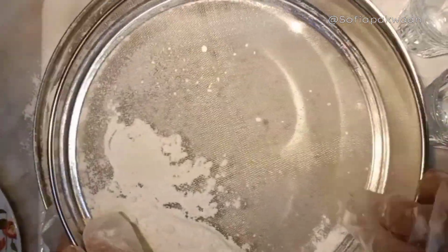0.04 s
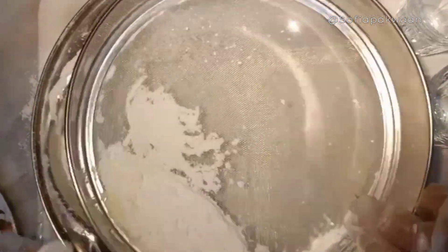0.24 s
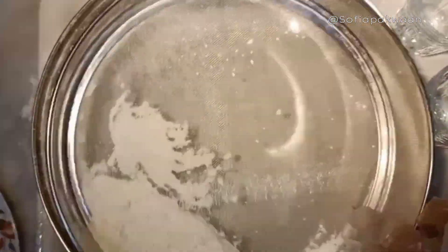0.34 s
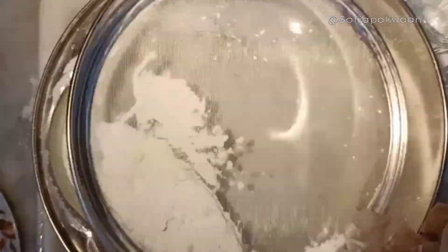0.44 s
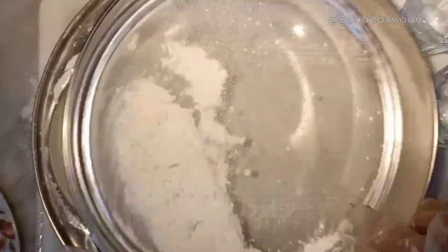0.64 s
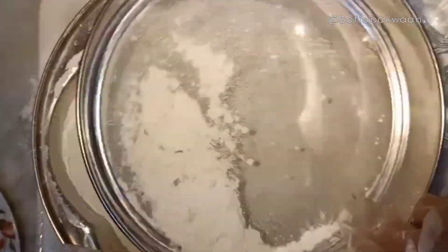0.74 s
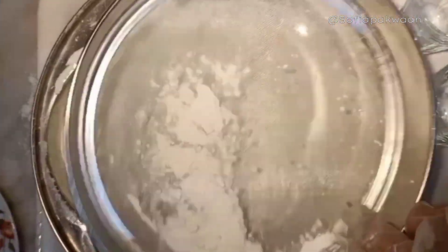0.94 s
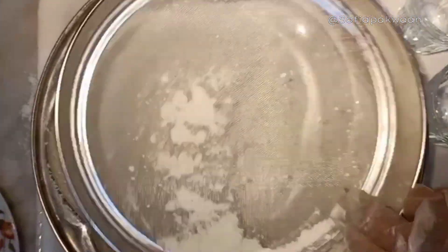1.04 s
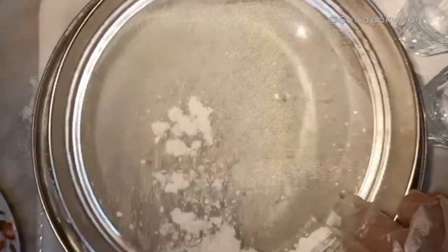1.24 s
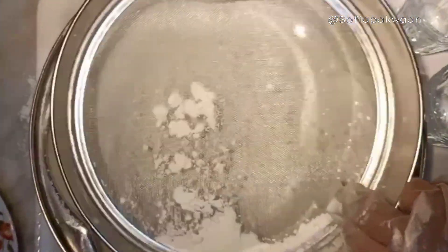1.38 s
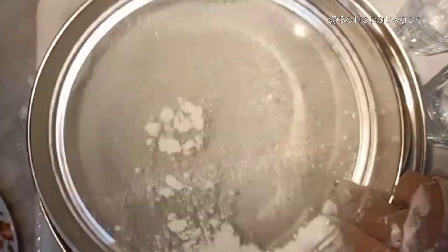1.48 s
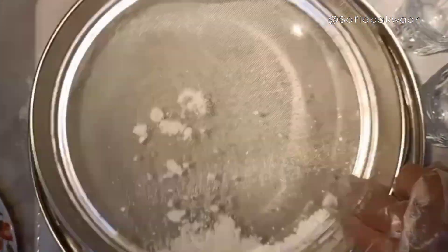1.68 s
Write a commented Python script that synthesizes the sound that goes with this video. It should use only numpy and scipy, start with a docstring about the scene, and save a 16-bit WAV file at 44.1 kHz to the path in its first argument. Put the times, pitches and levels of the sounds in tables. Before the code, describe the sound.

A metal sieve knocks and rings against a steel bowl amid swishing flour, close up in a kitchen

```python
"""A steel flour sieve is shaken over a steel bowl in a kitchen.
First flour hisses over the wire mesh among light ticks, and goes on hissing, swell by swell, to the end.
The rim then clanks on the bowl three times, the first and third with a small rebound: noisy contacts that
wake decaying sine modes. Filtered-noise knocks fall after each clank, and ticks recur late.
Throughout, resonant noise gives a faint handling rumble, over a steady hum and soft room air."""
import sys
import numpy as np
from scipy import signal
from scipy.fft import rfft, irfft
from scipy.io import wavfile
from scipy.ndimage import uniform_filter1d

SR = 44100
rng = np.random.default_rng(int(sys.argv[2]) if len(sys.argv) > 2 else 0)


def to_wav(s):
    """Save 16-bit WAV."""
    ch = np.atleast_2d(s).T  # columns
    pcm = np.round(np.clip(ch, -1, 1) * 32767)  # PCM
    wavfile.write(sys.argv[1], SR, pcm.astype(np.int16))


N = 74970
T = np.arange(N) / SR  # t/s
HZ = np.fft.rfftfreq(N, 1 / SR)  # f/Hz


def amp(db):
    """Decibel law: 20 dB is a factor of ten in amplitude."""
    return 10 ** (np.asarray(db) / 20)


def evened(x):
    """Normalisation by root mean square: scales to rms 1."""
    return x / np.sqrt(np.mean(x ** 2) + 1e-20)


def read(points, hz):
    """Interpolation of a spectrum table on a logarithmic frequency axis."""
    f, value = np.transpose(points)
    return np.interp(np.log(hz + 1), np.log(f), value)


def level(points):
    """Amplitude envelope: gain over time, interpolated in decibels from (t/s, level/dB)."""
    return amp(np.interp(T, *np.transpose(points)))


def add(mix, s, sound):
    """Superposition: adds a sound to the mix from time s."""
    part = mix[max(round(s * SR), 0):]
    part += sound[:len(part)]


def fade(t, t60):
    """Exponential decay: falls by 60 dB in t60."""
    return np.exp(-np.log(1000) * t / t60)


def random_phase(magnitude):
    """Stationary noise: a given magnitude spectrum with random phases, at rms 1."""
    phases = np.exp(2j * np.pi * rng.random(len(HZ)))
    return evened(irfft(magnitude * phases, N))


def tint(x, colour):
    """Minimum-phase filtering: colours a sound without smearing its attack backwards."""
    gain = amp(np.maximum(read(colour, HZ), -100))
    cepstrum = irfft(np.log(evened(gain)), N)
    # folding the cepstrum onto positive times makes the filter causal
    cepstrum[1:N // 2] *= 2
    cepstrum[N // 2 + 1:] = 0
    impulse_response = irfft(np.exp(rfft(cepstrum)), N)[:4096]
    return signal.fftconvolve(x, impulse_response)[:N]


# reverberation time of the kitchen: (f/Hz, t60/s)
ROOM_DECAY = [(100, 0.34), (400, 0.38), (1000, 0.55), (2800, 0.6), (5000, 0.47), (8000, 0.48), (16000, 0.3)]


def dying(x):
    """Frequency-dependent reverberant decay: each band falls at the kitchen's own rate."""
    hz, t, bands = signal.stft(x, SR, nperseg=256)
    decay = 1e-3 ** (t / read(ROOM_DECAY, hz)[:, None])
    return signal.istft(bands * decay, SR, nperseg=256)[1][:N]


def kitchen(x):
    """Diffuse reverberation: convolution with decaying noise of unit energy."""
    tail = dying(rng.standard_normal(N))
    return signal.fftconvolve(x, tail / np.linalg.norm(tail))[:N]


def blow(colour, rise_s, hold_s, t60, tail_db):
    """Broadband excitation: chattering contact wakes many close modes; a diffuse tail follows."""
    contact = rng.choice([-1., 1.], N) * fade(np.maximum(T - hold_s, 0), t60)
    tail = amp(tail_db) * dying(rng.standard_normal(N))
    attack = np.minimum(T / rise_s, 1)
    return tint(attack * (contact + tail), colour)


RING_RISE_S = 0.002
FLUTTER_STEP_S = .008


def ring(modes, flutter=0):
    """Modal superposition: decaying sines of struck steel; loose contact makes each one flutter."""
    knots = np.arange(0, N / SR, FLUTTER_STEP_S)
    out = np.zeros(N)
    for hz, db, t60 in modes:
        waver = 1 + flutter * np.interp(T, knots, rng.standard_normal(len(knots)))
        sine = np.sin(2 * np.pi * (hz * T + rng.random()))
        out += amp(db) * fade(T, t60) * waver * sine
    return np.minimum(T / RING_RISE_S, 1) * out


# rim on bowl: (t/s, bowl clash level/dB, sieve clash level/dB, bowl ring level/dB,
# sieve ring level/dB, base thump level/dB, low-pass cutoff f/Hz)
CLANK_EVENTS = [(0.2388, -15.5, -54, -26.5, -36, -31.5, 12000), (0.2664, -25, -30, -39, -63, -33, 4540),
                (0.6789, -30.5, -38, -52, -41.5, -40.5, 4080),
                (1.0419, -28.5, -17.5, -47.5, -29, -35, 13000), (1.06, -47, -31.5, -46.5, -43, -51, 7150)]
# long modes of the bowl: (f/Hz, relative level/dB, t60/s)
BOWL_MODES = [(535, -8, .35), (932, -12, .35), (1187, -7, .3), (1666, -8, .38), (1717, -11, .5),
              (1864, 1, .42), (1892, -3, .3), (1932, -5, .36), (1977, 2, .3), (2046, -6, .36),
              (2500, -9, .42), (2654, -7, .43), (2859, -6, .4), (3209, -6, .38), (3854, -9, .42),
              (3935, -2, .24), (3968, -2, .26), (4624, -13, .22)]
# long modes of the sieve frame: (f/Hz, relative level/dB, t60/s)
SIEVE_MODES = [(290, -13, .45), (662, -14, .3), (910, -11, .28), (1156, -12, .4), (1188, -12, .25),
               (1660, -5, .38), (1984, -2, .36), (2051, -1, .29), (2161, -1.5, .28), (2255, -6, .34),
               (2422, -10, .28), (2957, -2, .33), (3090, -10, .3), (3790, -7, .2), (4148, -4, .28),
               (6675, -11, .28)]
# low modes of the bowl's base, shaken by clanks and knocks: (f/Hz, relative level/dB, t60/s)
BASE_MODES = [(481.6, -12.5, 0.38), (535.7, -6.5, 0.33), (581, 2.5, 0.051), (637, 1.5, 0.045)]
# dense higher modes of the bowl: (f/Hz, relative level/dB)
BOWL_CLASH_COLOUR = [(150, -52), (390, -13.5), (540, -2.5), (740, -6), (1200, -5), (1600, -3.5), (2000, 0),
                     (2700, -4), (3500, -5), (4000, -3), (4500, -15), (7000, -11), (8000, -25),
                     (11000, -41), (16000, -35)]
# dense higher modes of the sieve: (f/Hz, relative level/dB)
SIEVE_CLASH_COLOUR = [(150, -29), (300, 2.5), (420, -10), (560, -3), (800, -17), (1000, -18), (1200, 8.5),
                      (1480, 2), (1620, -2.5), (1800, -6.5), (2100, 16), (2550, -2), (2950, 8.5), (3450, 1),
                      (4100, 6.5), (5700, -16.5), (6650, 0.5), (7600, -17), (10000, -27), (16000, -30)]
CLASH = dict(rise_s=.001, hold_s=.004, t60=.022, tail_db=-10)
FLUTTER = .4  # standard deviation at the knots, relative to the mode's amplitude
RING_WET_DB = -14.5  # reverberation relative to the rings
BOOM_DB, BOOM_RISE_S, BOOM_T60 = -25, 0.15, 0.3  # level relative to both clashes together


def clanks():
    """Impact coupling: where the rim lands divides the sound between bowl and sieve; soft is duller."""
    out = np.zeros(N)
    for s, bowl_db, sieve_db, bowl_ring_db, sieve_ring_db, base_db, cutoff_hz in CLANK_EVENTS:
        bowl_clash = amp(bowl_db) * blow(BOWL_CLASH_COLOUR, **CLASH)
        sieve_clash = amp(sieve_db) * blow(SIEVE_CLASH_COLOUR, **CLASH)
        low_pass = signal.butter(2, cutoff_hz, fs=SR)
        clash = signal.lfilter(*low_pass, bowl_clash + sieve_clash)

        bowl_ring = amp(bowl_ring_db) * ring(BOWL_MODES, FLUTTER)
        sieve_ring = amp(sieve_ring_db) * ring(SIEVE_MODES, FLUTTER)
        rings = bowl_ring + sieve_ring
        thump = amp(base_db) * ring(BASE_MODES)

        boom_gain = amp(BOOM_DB) * np.hypot(amp(bowl_db), amp(sieve_db))
        boom = boom_gain * np.minimum(T / BOOM_RISE_S, 1) * fade(T, BOOM_T60) * rumble()
        add(out, s, clash + rings + thump + boom + amp(RING_WET_DB) * kitchen(rings))
    return out


# swells of the bowl's main note: (t/s, level/dB, rise/s, damped at t/s)
NOTE_SWELLS = [(.245, -29.5, 0.0052, .5), (.685, -42, 0.005, 0.76), (1.043, -28, 0.0051, 1.158),
               (1.19, -41, 0.026, 1.27)]
NOTE_HZ, FREE_T60, DAMPED_T60 = 818, 0.52, .1  # damping multiplies the free decay


def bowl_note():
    """Damped resonance: the bowl's main note swells and sings on until the sieve leans on it."""
    out = np.zeros(N)
    for s, db, rise_s, damped_s in NOTE_SWELLS:
        damping = fade(np.maximum(T + s - damped_s, 0), DAMPED_T60)
        note = ring([(NOTE_HZ, db, FREE_T60)])
        add(out, s, np.minimum(T / rise_s, 1) * damping * note)
    return out


# sieve seating on the bowl: (t/s, level/dB, attack/s)
KNOCK_EVENTS = [(.3285, -31.5, 0.00066), (.8085, -41.5, 0.00047), (.832, -44.5, 0.0037), (.845, -45, 0.003),
                (1.0735, -24, 0.00067), (1.372, -53.5, 0.0034)]
# spectrum of a dull knock: (f/Hz, relative level/dB)
KNOCK_COLOUR = [(80, -47), (160, -18.5), (300, -11.5), (400, -12.5), (520, -9.5), (850, 2.5), (1100, -12),
                (1400, -12), (2000, -41), (5000, -52), (16000, -65)]
BASE_KNOCK_DB = -10.5  # base modes, on top of the knock's level


def knocks():
    """Low-frequency impact: dull contact noise shakes the base modes as the sieve shifts."""
    out = np.zeros(N)
    for s, db, rise_s in KNOCK_EVENTS:
        contact = blow(KNOCK_COLOUR, rise_s, hold_s=0.0011, t60=0.084, tail_db=-14)
        base = amp(BASE_KNOCK_DB) * ring(BASE_MODES)
        add(out, s, amp(db) * (contact + base))
    return out


# light ticks of the rim: (t/s, level/dB, centre f/Hz)
TICK_EVENTS = [(.0065, -42.5, 3350), (0.0549, -54, 6360), (.084, -47, 2620), (0.095, -47, 1800),
               (.102, -45.5, 2300), (0.192, -60, 6600), (0.214, -62, 5000), (0.8085, -44, 4140),
               (.846, -47, 5000), (1.512, -48, 3800)]
TICK_OCTAVES, TICK_SKIRT_DB = 0.82, -33  # width of the spectral peak, level far from it


def ticks():
    """Band-limited impulse: each brief rim contact has one broad spectral peak."""
    out = np.zeros(N)
    for s, db, hz in TICK_EVENTS:
        octaves = np.log2((HZ + 1) / hz)
        peak = np.exp(-.5 * (octaves / TICK_OCTAVES) ** 2)
        colour = np.column_stack([HZ + 1, TICK_SKIRT_DB * (1 - peak)])
        tick = blow(colour, rise_s=0.0005, hold_s=0.002, t60=0.006, tail_db=-12)
        add(out, s, amp(db) * tick)
    return out


# flour sliding on the mesh: (t/s, level/dB)
SLIDE_LEVEL = [(0, -52), (.065, -59), (.09, -50), (.125, -62), (.17, -57), (.2, -48), (.215, -55),
               (.226, -64), (.46, -56.5), (.53, -47.5), (.66, -50.5), (.71, -46.5), (.86, -47.5),
               (.97, -48), (1.03, -53.5), (1.12, -47), (1.34, -51), (1.45, -52), (1.53, -45.5),
               (1.61, -51.5), (1.66, -47), (1.7, -52.5)]
# resonances of mesh and frame: (f/Hz, relative level/dB)
MESH_COLOUR = [(200, -62), (1000, -39), (1700, -18), (2100, -0.5), (2500, -5), (2980, 1), (3400, -3),
               (4000, -0.5), (4600, -6.5), (5600, -7), (6200, -5.5), (6700, 3), (7700, -13), (9000, -16),
               (9700, -24), (15500, -27)]
GRAINS_PER_S, GRAIN_SPREAD_DB = 6200, 0.5
CLUMP_DB, CLUMP_SAMPLES = 1.3, 700  # rms level swing, smoothing length
MESH_WET_DB = -2  # reverberation relative to the hiss


def flour():
    """Granular excitation: random impulses in small clumps sound through the frame's resonances."""
    struck = rng.random(N) < GRAINS_PER_S / SR
    strength = amp(GRAIN_SPREAD_DB * np.minimum(rng.exponential(1, N), 5))
    grains = struck * rng.standard_normal(N) * strength
    swing = evened(uniform_filter1d(rng.standard_normal(N), size=CLUMP_SAMPLES))
    clumped = grains * amp(CLUMP_DB * swing)
    hiss = evened(irfft(rfft(clumped) * amp(read(MESH_COLOUR, HZ)), N))
    return level(SLIDE_LEVEL) * evened(hiss + amp(MESH_WET_DB) * kitchen(hiss))


# low resonances of counter and room: (f/Hz, width f/Hz, relative level/dB)
RUMBLE_MODES = [(58, 18, -16), (118, 15.3, 0.5), (139.3, 13.3, 1.5), (219, 24, -6), (297, 10, -1),
                (340.3, 16.3, -7.5), (522, 85, -15), (833, 29, -11.5), (1170, 210, -15.5)]


def rumble():
    """Resonant filtering: noise, at rms 1, in the low resonances of counter and room."""
    power = np.zeros(len(HZ))
    for hz, width, db in RUMBLE_MODES:
        power += amp(db) ** 2 / (1 + ((HZ - hz) / width) ** 2) ** 2
    return random_phase(np.sqrt(power))


# handling rumble: (t/s, level/dB)
HANDLING_LEVEL = [(0, -59), (.12, -60), (.23, -64.5), (.32, -50), (.4, -51.5), (.5, -57), (.63, -66),
                  (.69, -59.5), (.8, -58.5), (.87, -57.5), (.95, -64.5), (1.03, -66.5), (1.11, -50),
                  (1.22, -57), (1.33, -56), (1.45, -58), (1.7, -66)]


def handling():
    """Structure-borne sound: handling stirs the low resonances."""
    return level(HANDLING_LEVEL) * rumble()


HUM_HZ, HUM_DB = 56, -72  # rms level


def hum():
    """Pure tone: a faint steady sine."""
    return amp(HUM_DB) * np.sqrt(2) * np.sin(2 * np.pi * (HUM_HZ * T + rng.random()))


# spectrum of the room air: (f/Hz, relative level/dB)
AIR_COLOUR = [(30, -24), (600, 0.5), (3000, -32.5), (15000, -60)]
AIR_DB = -76  # rms level


def air():
    """Stationary background noise: soft, mostly low room air."""
    return amp(AIR_DB) * random_phase(amp(read(AIR_COLOUR, HZ)))


def scene():
    """Superposition of all sources at one microphone."""
    struck = clanks() + bowl_note() + knocks() + ticks()
    return (struck + flour() + handling() + hum() + air())[None]


EDGE_HZ = 15750


def record(dry):
    """Band limitation: a linear-phase low-pass filter, the recorder's upper edge."""
    low_pass = signal.firwin(511, EDGE_HZ, window=("kaiser", 9), fs=SR)
    return signal.oaconvolve(dry, low_pass[None], "same")


dry = scene()
out = record(dry)
to_wav(out)
```